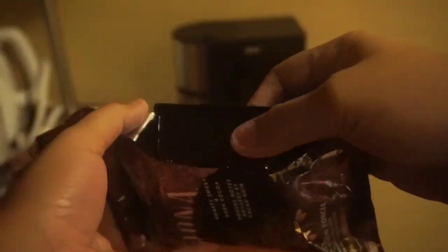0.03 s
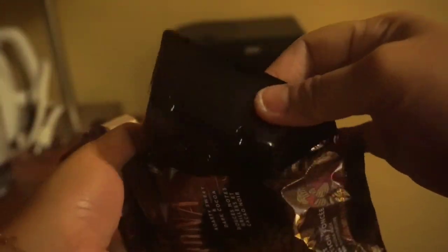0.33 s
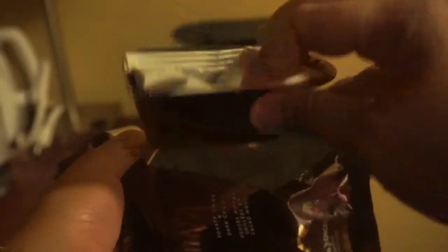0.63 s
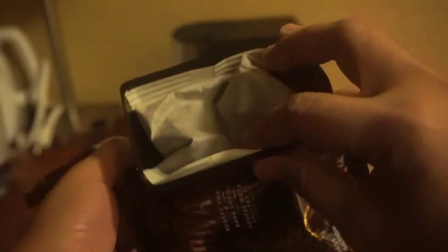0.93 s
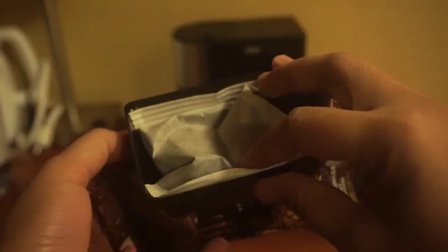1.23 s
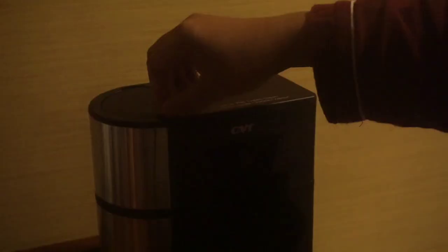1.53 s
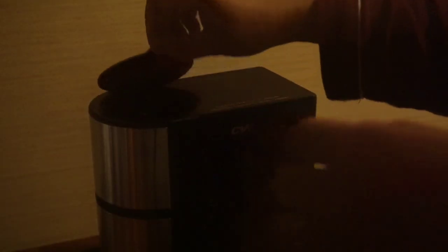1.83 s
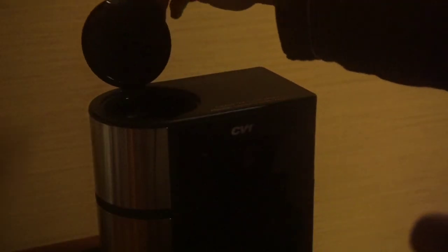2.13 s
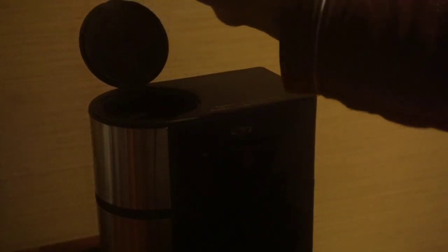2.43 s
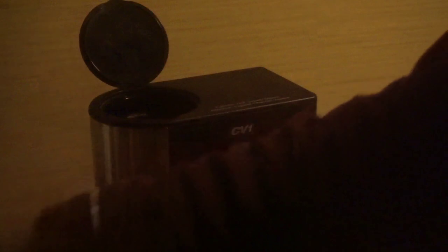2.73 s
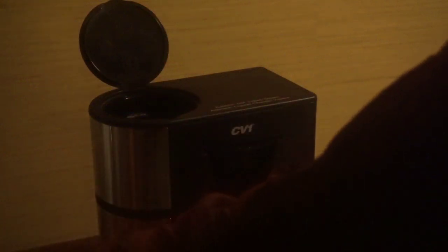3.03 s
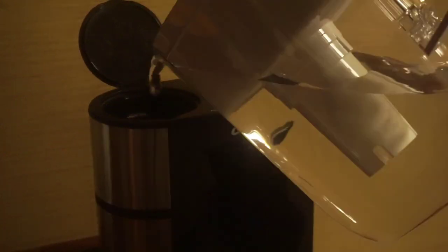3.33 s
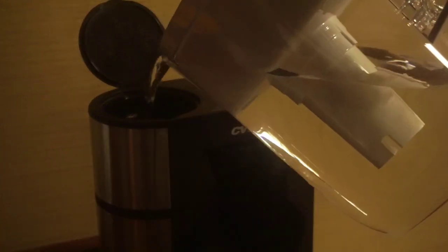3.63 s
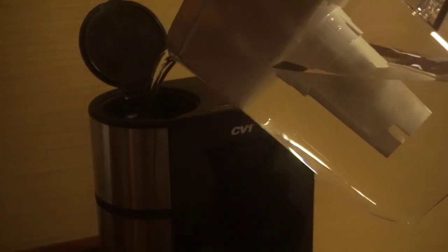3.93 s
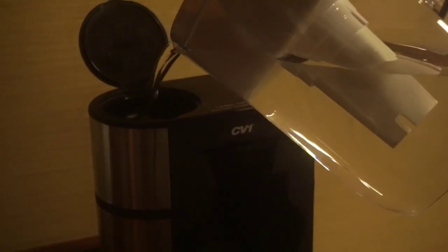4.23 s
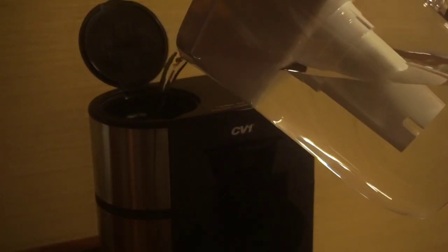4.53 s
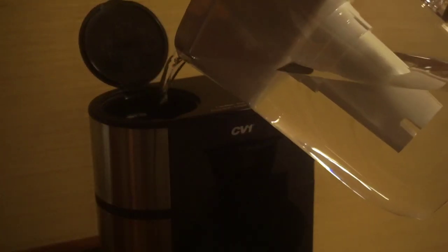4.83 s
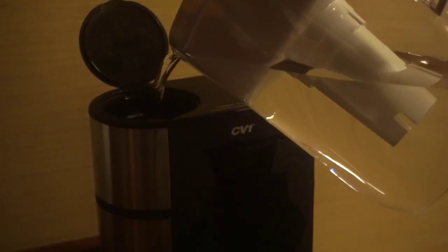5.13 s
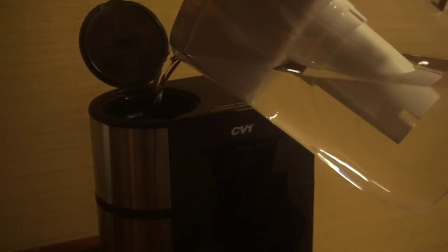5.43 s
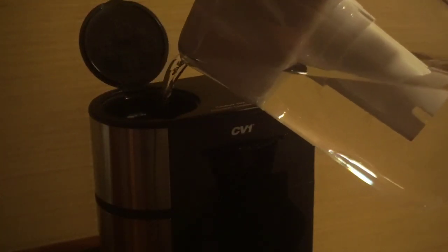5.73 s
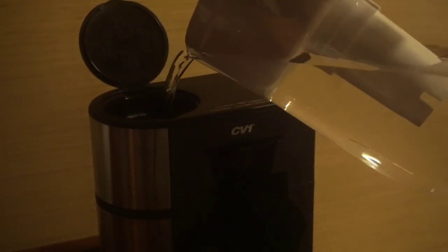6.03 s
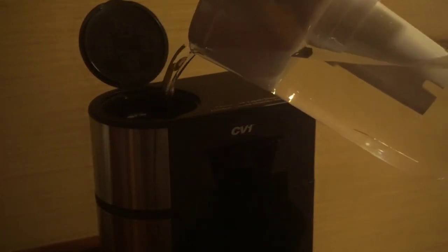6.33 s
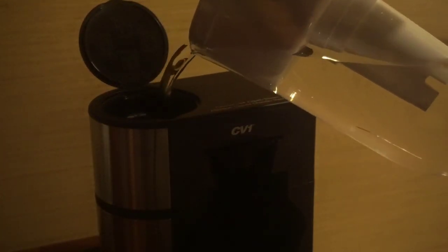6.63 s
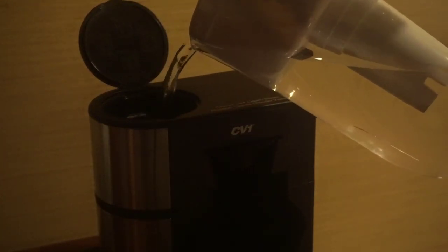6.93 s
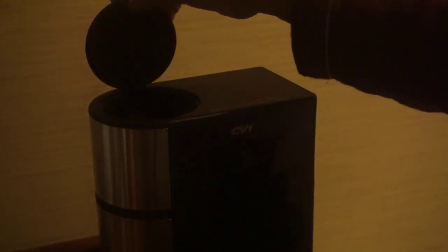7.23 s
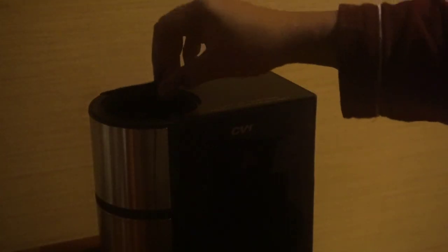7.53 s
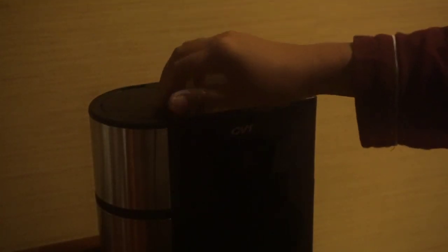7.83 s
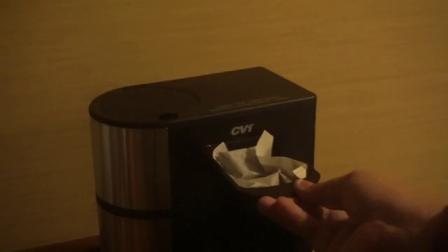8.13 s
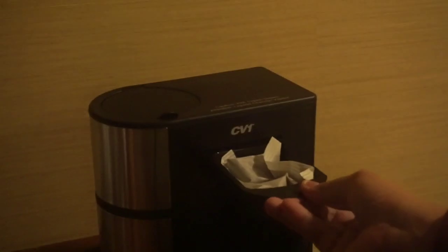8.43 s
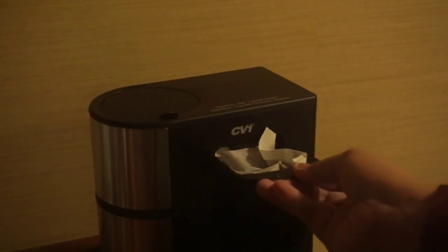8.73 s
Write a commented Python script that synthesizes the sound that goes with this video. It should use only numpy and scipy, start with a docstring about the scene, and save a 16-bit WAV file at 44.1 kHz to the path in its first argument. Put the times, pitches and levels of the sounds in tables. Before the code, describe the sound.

A foil packet crackles, water is poured into a small coffee maker, then a lid knocks shut and a plastic tray clicks.

```python
"""A foil packet crackles close by as a plastic tray is pulled out: its creases snap and ring it.
Then a thin stream of water, full of tiny ringing bubbles, is poured from a jug into a small
coffee maker. The lid shuts with a knock, and the tray clicks against its slot.
Behind it all is a quiet room with a soft hiss and the throbbing hum of two machines.
The level dips briefly four times, between the steps of the scene."""
import sys
import numpy as np
from scipy import signal
from scipy.fft import rfft, irfft, next_fast_len
from scipy.io import wavfile

SR = 44100
rng = np.random.default_rng(int(sys.argv[2]) if len(sys.argv) > 2 else 0)


def transcribe(u):
    """Save the signal u as a 16-bit wav file named by the first command-line argument.

    u: samples, shape (n,) or (channels, n), limited to [-1, 1]; the rate is SR.
    q: integer samples, one column per channel.
    """
    v = np.clip(np.atleast_2d(u).T, -1, 1)
    q = np.round(v * 32767).astype(np.int16)
    wavfile.write(sys.argv[1], SR, q)


N = 387638
TIME = np.arange(N) / SR
FFT_SIZE = next_fast_len(N + SR)
HZ = np.maximum(np.fft.rfftfreq(FFT_SIZE, 1 / SR), 1)

# the five steps (packet, rubbing, pour, lid, tray): start_s, first_hum_swell_s
STEPS = [(0, .03), (1.562, 1.665), (3.222, 3.29), (6.998, 7.103), (8.139, 8.182)]


def from_db(db):
    """Turn decibels into a number to multiply by."""
    return 10 ** (np.asarray(db) / 20)


def rms_one(x):
    """Scale a sound to an average power of 1."""
    return x / np.sqrt(np.mean(x ** 2) + 1e-20)


def bump(time_s, half_s):
    """A smooth rise to 1 and fall around one moment."""
    return np.exp(-((TIME - time_s) / half_s) ** 2)


def over_hz(rows):
    """Join a table's rows into curves over pitch, one for each column after the first."""
    hz, *columns = np.transpose(rows)
    return [np.interp(np.log(HZ), np.log(hz), column) for column in columns]


def filtered(x, response):
    """Make each frequency louder, softer or later, as the response says."""
    return irfft(rfft(x, FFT_SIZE) * response, FFT_SIZE)[..., :N]


def coloured(x, spectrum):
    """Shape the tone with rows of pitch_hz, level_db."""
    return filtered(x, from_db(over_hz(spectrum)[0]))


def cut_bass(x, hz, order):
    """Weaken everything below hz; a higher order cuts more steeply."""
    return signal.sosfilt(signal.butter(order, hz, "high", fs=SR, output="sos"), x)


def resonate(x, hz, width_hz):
    """Ring at one pitch; the narrower the width, the longer the ring."""
    r = np.exp(-np.pi * width_hz / SR)
    feedback = [1, -2 * r * np.cos(2 * np.pi * hz / SR), r * r]
    return signal.lfilter(np.array([1, 0, -1]) * (1 - r * r) / 2, feedback, x + 1e-18)


def body(x, modes):
    """An object rings at several pitches at once, every second one upside down."""
    return sum((-1) ** k * from_db(db) * resonate(x, hz, width)
               for k, (hz, width, db) in enumerate(modes))


def clicks(times, levels_db):
    """One click per contact; at 0 dB it holds the energy of a millisecond at full level."""
    out = np.zeros(N)
    samples = np.clip(np.round(np.asarray(times) * SR).astype(int), 0, N - 1)
    np.add.at(out, samples, from_db(levels_db) * np.sqrt(SR / 1000))
    return out


def grains(per_s, spread_db):
    """Tiny clicks of uneven size at random times."""
    sizes = from_db(spread_db * np.minimum(rng.exponential(1, N), 4)) * rng.choice([-1, 1], N)
    return sizes * (rng.random(N) < per_s / SR)


def cascade(x, decay_s, per_s):
    """Each click sets off a dying shower of smaller ones with about the same total energy."""
    r = np.exp(-2 / (decay_s * SR))
    energy = signal.lfilter([0, 1 - r], [1, -r], x ** 2 + 1e-18)
    return np.sqrt(energy) * rms_one(grains(per_s, spread_db=-3.0))


def showers(rows, per_s):
    """Short showers of tiny impacts, each swelling and fading around its own pitch."""
    out = np.zeros(N)
    impacts = grains(per_s, spread_db=4.5)
    for time_s, half_s, db, hz, width in rows:
        near = np.abs(TIME - time_s) < 2 * half_s
        ringing = resonate(impacts[near], hz, width * np.sqrt(2))
        shower = rms_one(resonate(ringing, hz, width * np.sqrt(2)))
        out[near] += from_db(db) * shower * np.exp(-2 * ((TIME[near] - time_s) / half_s) ** 2)
    return out


def dying_noise(fade_s):
    """Half a second of noise that falls by 60 dB every fade_s."""
    tail = rng.standard_normal(SR // 2) * from_db(-60 * TIME[:SR // 2] / fade_s)
    return tail / np.linalg.norm(tail)


def in_front(x, desk_db, room_db, desk_delay_s=0.003, room_delay_s=0.006):
    """A sound and its quick desk echoes arrive from in front; the room's echo comes from all around."""
    # how the two microphones hear it: pitch_hz, left_lead_radians, left_minus_right_db
    directions = [(310, -1.5, 2), (1140, -2.04, 4.5), (2500, -1.7, 9), (4600, -1.6, 12.5),
                  (7300, -1.35, 17), (11200, -1.65, 15)]
    lead, left_db = over_hz(directions)
    sides = np.array([from_db(left_db / 2), from_db(-left_db / 2) * np.exp(-1j * lead)])
    desk = rfft(dying_noise(fade_s=0.17), FFT_SIZE) * np.exp(-2j * np.pi * HZ * desk_delay_s)
    near = x + from_db(desk_db) * filtered(x, desk)
    tails = np.array([dying_noise(fade_s=0.75) for _ in range(2)])
    room = rfft(tails, FFT_SIZE) * np.exp(-2j * np.pi * HZ * room_delay_s)
    return filtered(near, sides) + from_db(room_db) * filtered(x, room)


def knocks(hits, modes, ring_db, tick_db):
    """Each hit, with its own strength and brightness, ticks and rings a body, with the deep bass taken out."""
    force = np.zeros(N)
    for time_s, db, brightness_hz in hits:
        cut_treble = signal.butter(1, brightness_hz, fs=SR, output="sos")
        force += signal.sosfilt(cut_treble, clicks([time_s], [db]) + 1e-18)
    force = cut_bass(force, hz=310, order=4)
    tick = cut_bass(force, hz=500, order=2)
    tick_tail = filtered(tick, rfft(dying_noise(fade_s=0.061), FFT_SIZE))
    return from_db(ring_db) * body(force, modes) + from_db(tick_db) * (tick + tick_tail)


def room_air(level_db=-42.0):
    """The room's air hisses evenly, partly alike on the left and the right."""
    # tone of the hiss: pitch_hz, level_db
    hiss_tone = [(20, 3), (60, -26.5), (110, -27), (170, -21.5), (250, -16.5), (400, -6), (550, -4.5),
                 (750, -1), (1600, -4.5), (3200, -9), (11000, -14.5), (12000, -117)]
    # how the two microphones hear it: pitch_hz, left_lead_radians, left_minus_right_db, likeness (0-1)
    directions = [(100, -1.5, -0.5, 0.8), (350, -0.5, 3, 0.46), (600, -2.5, 1, 0.78), (1120, -2, 0.5, 1),
                  (3000, -2, -2.8, 0.23), (4520, -9.5, -4, 0.032), (9200, -20.5, -3, 0.074)]
    lead, left_db, alike = over_hz(directions)
    shared, own = rng.standard_normal((2, N))
    left = filtered(shared, from_db(left_db / 2))
    right = filtered(shared, from_db(-left_db / 2) * alike * np.exp(-1j * lead))
    right += filtered(own, from_db(-left_db / 2) * np.sqrt(1 - alike ** 2))
    return from_db(level_db) * rms_one(coloured(np.array([left, right]), hiss_tone))


def machine_hum(pitch_hz=360, beat_hz=9.6, upper_db=2.0, left_db=1.0, lead_radians=1.92, waver_db=2.0):
    """Two machines hum at nearly the same pitch, so their tones add up and cancel in turn."""
    # strength of the hum in each step: level_db
    step_levels = [-50, -53, -50, -51, -52.5]
    # the hum fades and returns: time_s, half_length_s, depth_db
    fades = [(.15, 0.43, 5.5), (3.85, 0.59, 10.5), (6.848, 0.16, 6)]
    starts, first_swells = np.transpose(STEPS)
    step = np.searchsorted(starts, TIME, side="right") - 1
    beating = 1 + from_db(upper_db) * np.exp(2j * np.pi * beat_hz * (TIME - first_swells[step]))
    pair = np.exp(2j * np.pi * pitch_hz * TIME) * beating
    left = pair * from_db(left_db / 2)
    right = pair * from_db(-left_db / 2) * np.exp(-1j * lead_radians)
    waver_times = np.linspace(0, TIME[-1], 45)
    waver_levels = waver_db * rng.standard_normal((2, len(waver_times)))
    waver = from_db([np.interp(TIME, waver_times, side) for side in waver_levels])
    fade_db = sum(depth_db * bump(time_s, half_s) for time_s, half_s, depth_db in fades)
    return from_db(np.take(step_levels, step) - fade_db) * waver * np.real([left, right])


def rubbing():
    """Sleeve, hand, lid and tray rub: each stroke is a shower of tiny impacts."""
    # strokes: time_s, half_length_s, level_db, pitch_hz, width_hz
    strokes = [(2.42, 0.098, -51, 2750, 1800), (2.99, 0.019, -47, 1590, 500), (3.11, 0.24, -47, 1560, 910),
               (7.828, 0.03, -26, 735, 600), (8.288, 0.037, -37, 577, 201), (8.412, 0.013, -40, 620, 250),
               (8.625, 0.029, -33, 1880, 403)]
    return showers(strokes, per_s=6300)


def tray_clicks():
    """The plastic tray bumps against its slot and rings briefly."""
    # tray touching the slot: time_s, level_db, brightness_hz
    hits = [(8.577, -20, 600), (8.592, -11, 4530), (8.594, -17.5, 3500), (8.599, -16.5, 3000),
            (8.622, -24, 3000), (8.688, -17, 500)]
    # ringing of the tray: pitch_hz, width_hz, level_db
    plastic = [(450, 140, -5), (721, 110, 1), (1240, 130, 4), (1770, 170, 4), (2050, 350, -2),
               (2600, 500, -8), (3250, 300, 0)]
    return in_front(knocks(hits, plastic, ring_db=10.5, tick_db=-10), desk_db=-8, room_db=-7)


def lid_knock():
    """The lid lands in a few quick hits that ring the coffee maker's shell."""
    # lid meeting its rim: time_s, level_db, brightness_hz
    hits = [(7.805, -32, 2500), (7.809, -23, 2500), (7.816, -14, 2000), (7.8245, -14, 500),
            (7.833, -24, 500)]
    # ringing of the shell: pitch_hz, width_hz, level_db
    shell = [(355, 40, 10), (410, 40, 2), (480, 70, -1), (607, 40, 14), (648, 36, 11), (1040, 70, 5),
             (1170, 60, 1), (1540, 110, 2), (2400, 250, -8)]
    return in_front(knocks(hits, shell, ring_db=14.5, tick_db=-5), desk_db=-13, room_db=-13)


def air_gulp():
    """A gulp of air in the water rings a hollow space."""
    # pushes of the gulp: time_s, level_db, brightness_hz
    pushes = [(4.622, -20, 1800), (4.629, -35, 1200), (4.642, -32, 1200)]
    # ringing of the hollow: pitch_hz, width_hz, level_db
    hollow = [(620, 56, -2), (814, 26, 14.5), (980, 100, 6.5), (1710, 180, -2.5)]
    return in_front(knocks(pushes, hollow, ring_db=18.0, tick_db=-1.5), desk_db=-4, room_db=-11.5)


def drips(cycles=6, impact_db=-5):
    """Each drop scatters droplets and traps a tiny bubble that plinks for a few cycles."""
    # the loudest drops: time_s, relative_level_db, pitch_hz
    drops = [(3.899, -27, 6860), (3.945, -27, 3300), (4.158, -27.5, 5300), (4.167, -26, 3270),
             (5.591, -28, 5450), (5.894, -29.5, 7500)]
    out = np.zeros(N)
    for time_s, db, hz in drops:
        impact = clicks([time_s], [db])
        splash = from_db(impact_db) * impact + cascade(impact, decay_s=0.015, per_s=2000)
        plink = resonate(resonate(splash, hz, hz / cycles), hz, hz / 4)  # twice, for a soft start
        out += plink * np.sqrt(SR * cycles / (np.pi * hz))
    return out / 2


def water_stream(full_s=3.93, ease_s=5.93, rise_db_per_s=14, fall_db_per_s=25, cycles=14):
    """Water from the jug traps small bubbles that ring for a few cycles, and stirs the tank's air."""
    # tone of the falling water: pitch_hz, level_db
    water_tone = [(300, -17), (700, -13), (1100, 3), (1800, 1.5), (3000, 1.5), (6000, -9), (11000, -17)]
    # the loudest spurts and gurgles: time_s, relative_level_db, pitch_hz
    splashes = [(4.30, -38, 970), (4.31, -43, 2330), (4.56, -39, 1880), (4.82, -44, 2240),
                (5.98, -44, 1780), (6.882, -44.5, 1600), (6.888, -43.5, 9250)]
    # ringing of the air in the tank: pitch_hz, width_hz, level_db
    tank_air = [(861, 24, 0), (1730, 200, -11)]
    pitches = np.geomspace(650, 9500, 18)
    births = grains(per_s=700, spread_db=2.5)
    pitch_choice = rng.integers(0, len(pitches), N)
    bubbles = sum(np.sqrt(hz) * rms_one(resonate(births * (pitch_choice == k), hz, hz / cycles))
                  for k, hz in enumerate(pitches))
    pouring = from_db(-49.5) * (TIME > STEPS[2][0]) * (TIME < STEPS[3][0])
    # the jug tips until the stream is full, holds, and is eased back
    flow_db = -rise_db_per_s * np.maximum(full_s - TIME, 0)
    flow_db -= fall_db_per_s * np.maximum(TIME - ease_s, 0)
    stream = pouring * from_db(flow_db) * rms_one(coloured(bubbles, water_tone))
    half_s, width_share = 0.033, 0.19
    spurts = showers([(s, half_s, db, hz, width_share * hz) for s, db, hz in splashes], per_s=4500)
    spray = in_front(stream + spurts, desk_db=1, room_db=-4.5)
    tank_ring = rms_one(body(rng.standard_normal((2, N)), tank_air))
    tank = pouring * from_db(0.55 * flow_db) * tank_ring  # swells less than the stream
    return from_db([[-5.5], [-2.5]]) * spray + from_db(-3) * tank  # spray level: left, right


def crease_flips(gap_s=0.008, loss_db=3):
    """A crease buckles once or in a quick, weakening run; gives rows of time_s, level_db, treble_db."""
    # snaps of the creases: start_s, level_db, treble_db, flip_count
    snaps = [(0.012, -20, 3.5, 1), (0.034, -13, -4, 1), (0.185, -18, -3, 1), (0.329, -18.5, -1, 1),
             (0.348, -16.5, -0.5, 1), (0.381, -14, 2, 1), (0.504, -13.5, -10, 1), (0.695, -13.5, -4, 1),
             (0.718, -20, 2, 1), (0.753, -22, 0, 1), (0.889, -21, -14, 1), (0.953, -21.5, -14, 1),
             (1.064, -7, -6, 3), (1.118, -16.5, -5.5, 1), (1.169, -12, 0, 2), (1.298, -14.5, 3.5, 2),
             (1.37, -20.5, -21, 1), (1.422, -19, 11.5, 1), (1.426, -8, 1, 1), (1.446, -18, 1.5, 2),
             (1.530, -9, -0.5, 1), (1.546, -10, -16, 1)]
    return [(start_s + k * gap_s, db - k * loss_db, treble_db)
            for start_s, db, treble_db, count in snaps for k in range(count)]


def foil_patches(flips, spread_db=1.25, ring_db=7, middle_hz=3200, cycles=13):
    """Each flipped patch of foil rings: the brighter the snap, the smaller and higher the patch."""
    out = np.zeros(N)
    for (time_s, level_db, treble_db), chance in zip(flips, rng.standard_normal(len(flips))):
        hz = np.clip(middle_hz * from_db(treble_db + spread_db * chance), 1150, 6000)
        out += from_db(ring_db) * resonate(clicks([time_s], [level_db]), hz, hz / cycles)
    return out


def foil_packet(hold_db=-43.5):
    """Creases snap and trip their neighbours; the sheet cracks brightly and the hollow packet rings."""
    # tone of the foil's crack: pitch_hz, level_db
    foil_tone = [(60, -25), (200, -22.5), (450, -2), (750, -10), (1100, 5.5), (2700, -1.5), (3350, -3),
                 (4300, -3.5), (6000, -8), (7800, -8.5), (9000, -12.5), (11000, -15.5)]
    # ringing of the packet with the tray inside: pitch_hz, width_hz, level_db
    packet = [(974, 128, -4.5), (1239, 59, 1.5), (1378, 70, 3), (1568, 83, 1.5), (1670, 89, -4.5),
              (1810, 280, -11), (2316, 127, -6)]
    # fingers squeeze the packet and it crinkles: time_s, half_length_s, level_db
    squeezes = [(0.066, 0.21, -32), (0.404, 0.054, -43), (0.787, 0.077, -39), (1.09, 0.059, -31),
                (1.53, 0.14, -31.5)]
    flips = crease_flips()
    times, level_db, treble_db = np.transpose(flips)
    crack = clicks(times, level_db + treble_db)
    crack = from_db(-6) * crack + from_db(4) * cascade(crack, decay_s=0.01, per_s=6600)
    push = clicks(times, level_db)
    push += from_db(-6) * cascade(push, decay_s=0.0096, per_s=5400)
    grip = from_db(hold_db) + sum(from_db(db) * bump(s, half_s) for s, half_s, db in squeezes)
    crinkle = grip * rms_one(grains(per_s=2700, spread_db=-3.0))
    dull_ticks = from_db(-7.5) * grip * rms_one(grains(per_s=60, spread_db=1.0))
    sheet = from_db(-2) * coloured(crack + crinkle, foil_tone) + foil_patches(flips)
    hollow = from_db(11) * body(push + from_db(-9.5) * crinkle + dull_ticks, packet)
    crackle = in_front(sheet, desk_db=-7.5, room_db=-6.5) + in_front(hollow, desk_db=-14, room_db=-16)
    return crackle * (TIME < STEPS[1][0])


def scene():
    """Packet, pour, lid and tray over the room's hum and hiss, with a brief dip between steps."""
    knocking = lid_knock() + tray_clicks() + air_gulp()
    small_sounds = in_front(rubbing() + drips(), desk_db=-8, room_db=-10.5)
    mix = foil_packet() + water_stream() + knocking + small_sounds + machine_hum() + room_air()
    dips = np.prod([1 - 0.85 * bump(start_s, half_s=0.0047) for start_s, _ in STEPS[1:]], axis=0)
    return mix * dips


def record(dry, top_hz=11080):
    """The highest peaks are rounded, the small microphone loses the bass, and the top is cut steeply."""
    rounded = 0.9 * np.tanh(dry / 0.9)
    thin = cut_bass(rounded, hz=110, order=2)
    return signal.sosfilt(signal.ellip(12, 0.1, 70, top_hz, fs=SR, output="sos"), thin)


dry = scene()
out = record(dry)
transcribe(out)
```